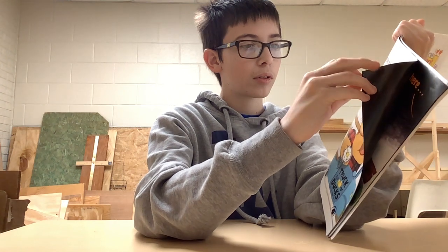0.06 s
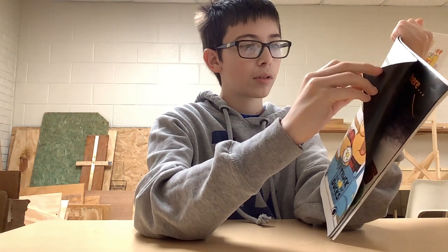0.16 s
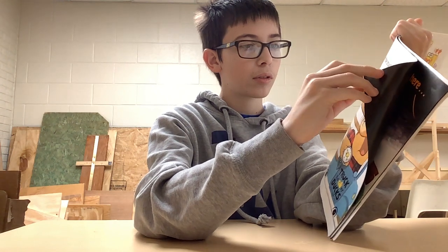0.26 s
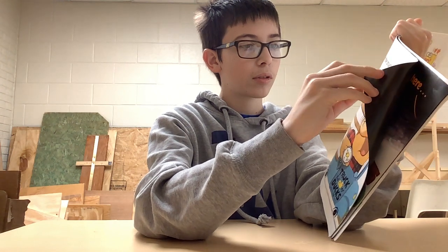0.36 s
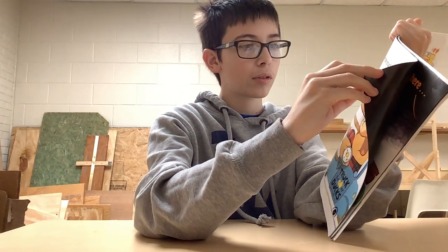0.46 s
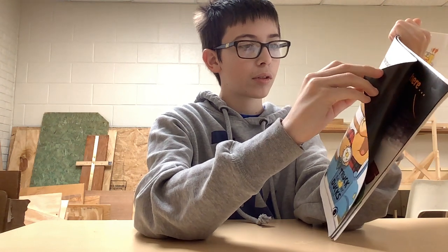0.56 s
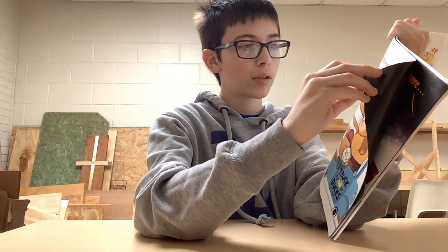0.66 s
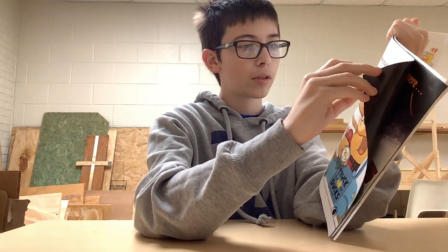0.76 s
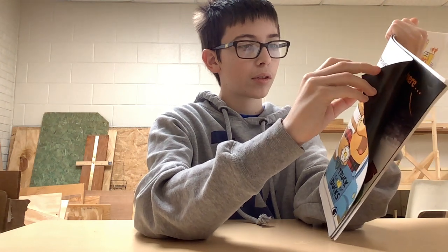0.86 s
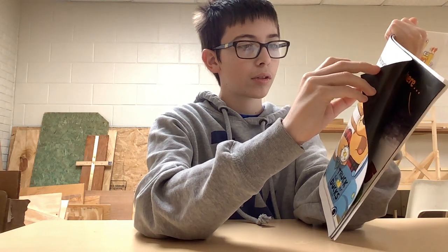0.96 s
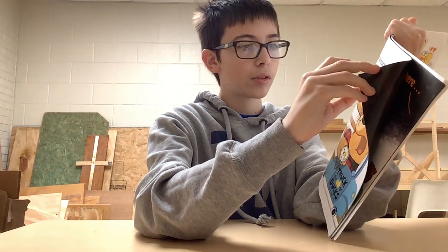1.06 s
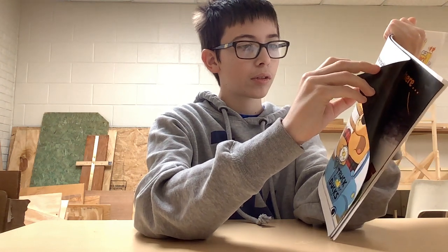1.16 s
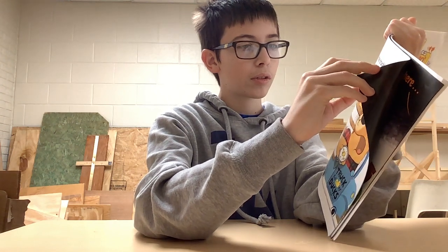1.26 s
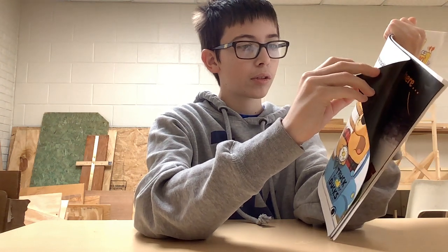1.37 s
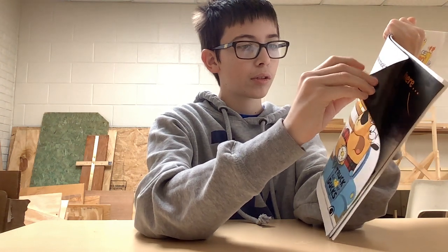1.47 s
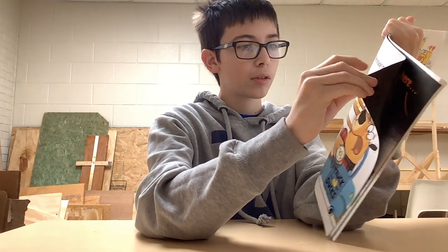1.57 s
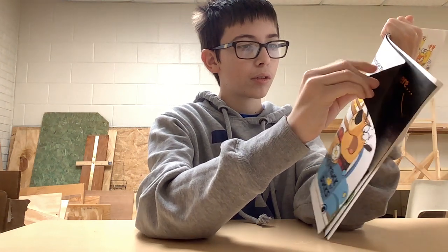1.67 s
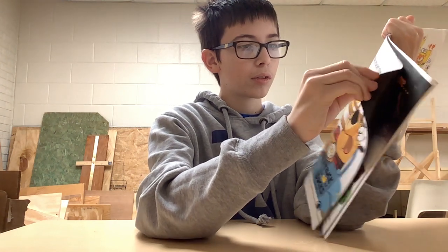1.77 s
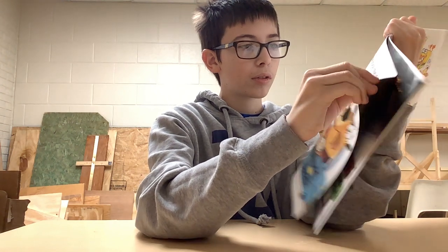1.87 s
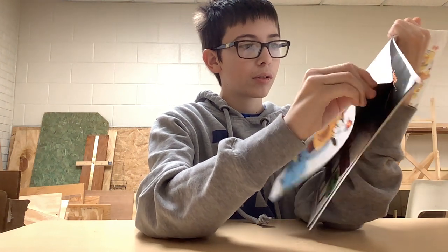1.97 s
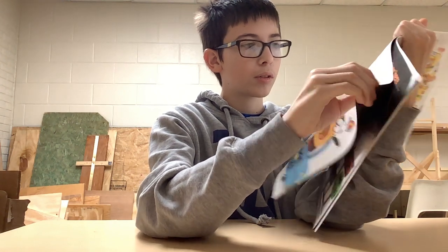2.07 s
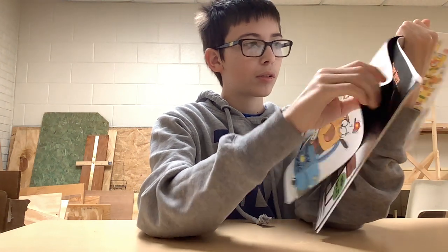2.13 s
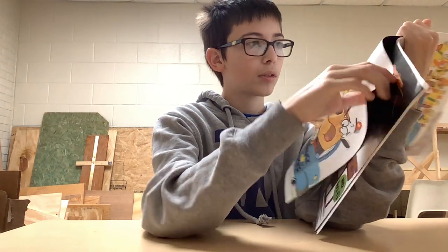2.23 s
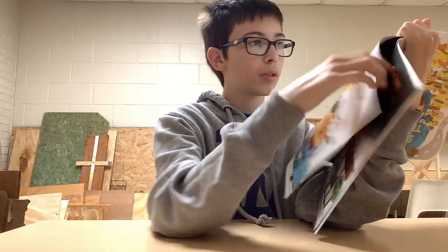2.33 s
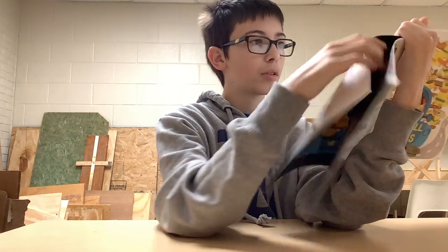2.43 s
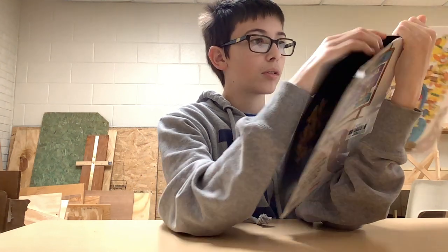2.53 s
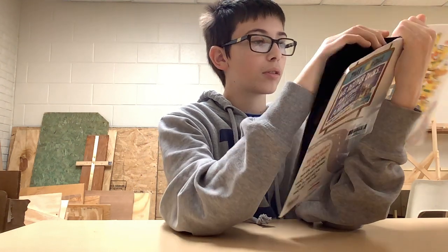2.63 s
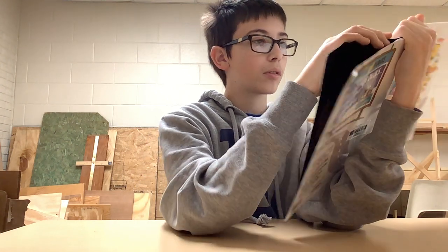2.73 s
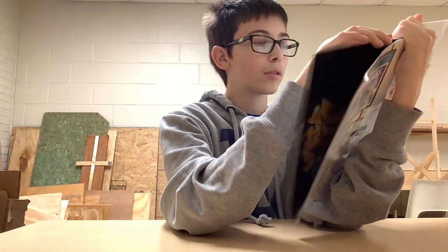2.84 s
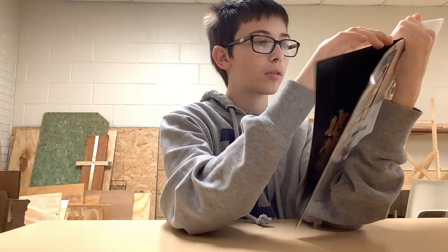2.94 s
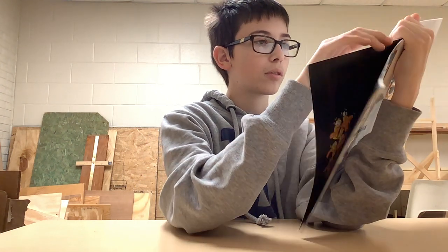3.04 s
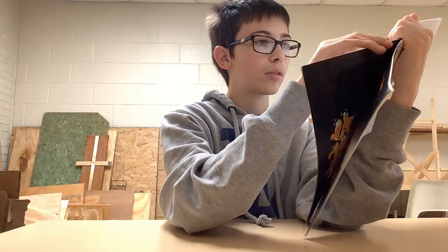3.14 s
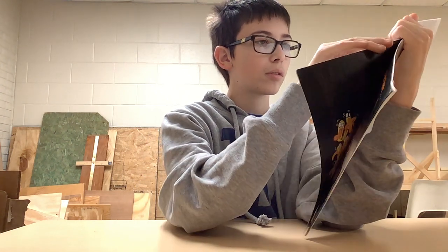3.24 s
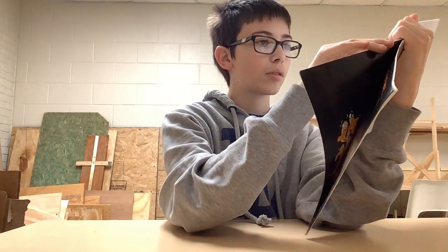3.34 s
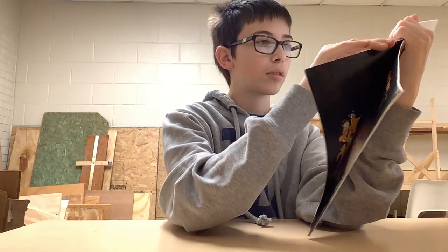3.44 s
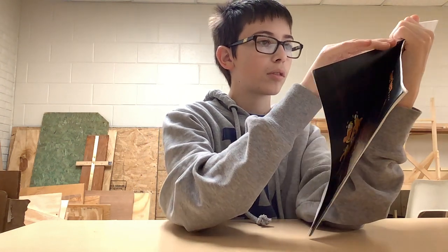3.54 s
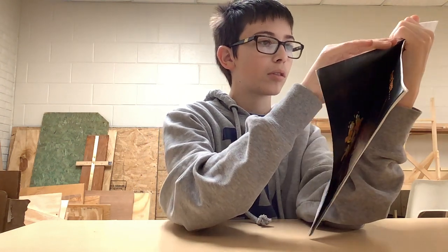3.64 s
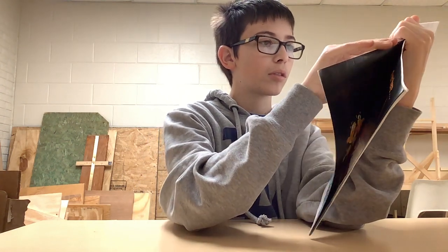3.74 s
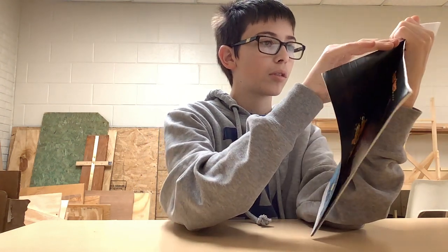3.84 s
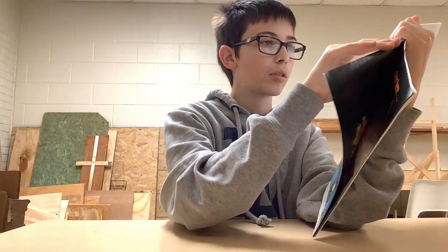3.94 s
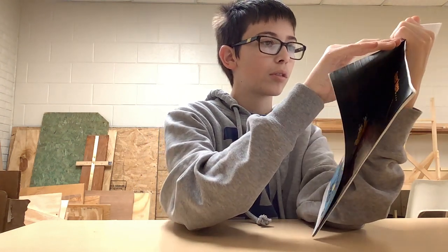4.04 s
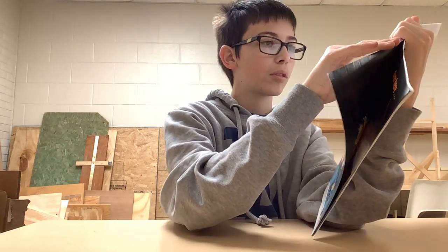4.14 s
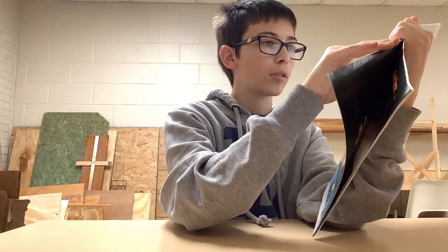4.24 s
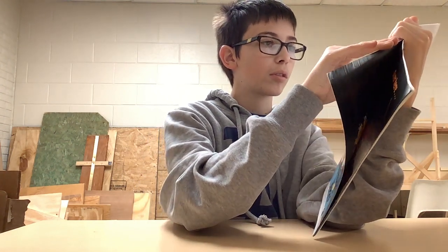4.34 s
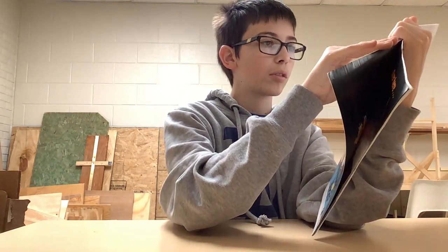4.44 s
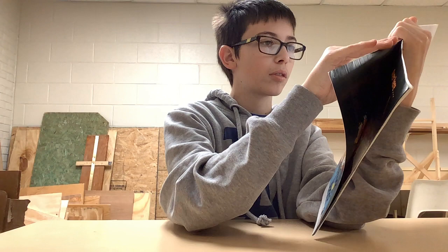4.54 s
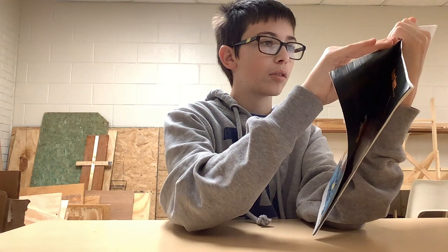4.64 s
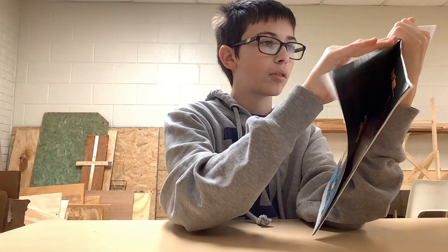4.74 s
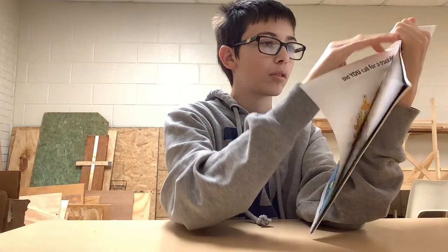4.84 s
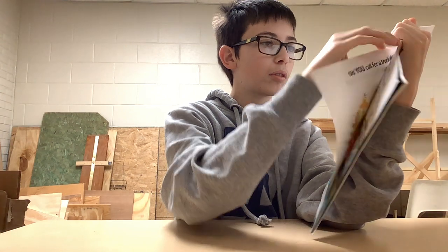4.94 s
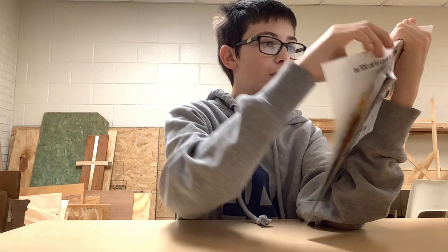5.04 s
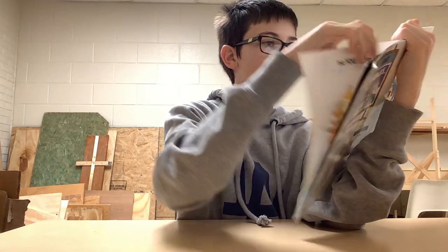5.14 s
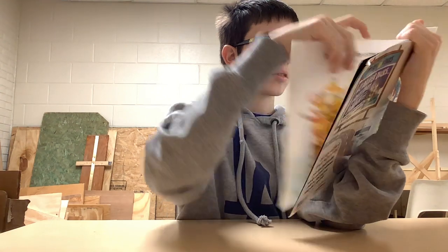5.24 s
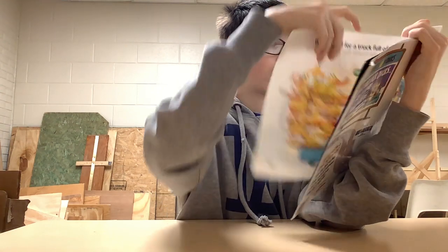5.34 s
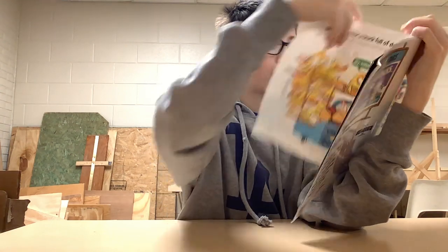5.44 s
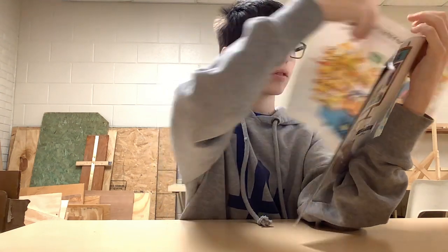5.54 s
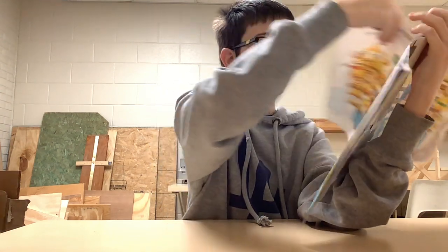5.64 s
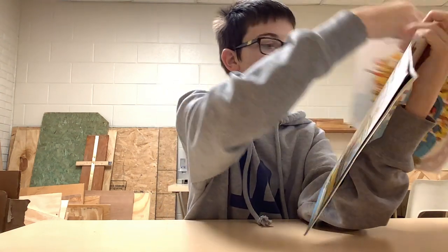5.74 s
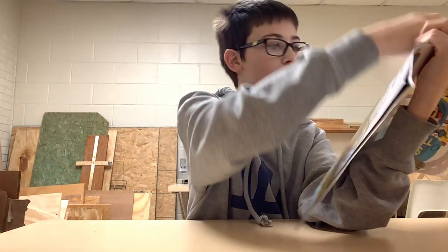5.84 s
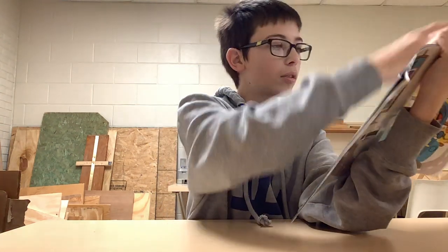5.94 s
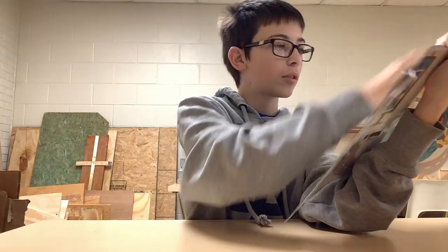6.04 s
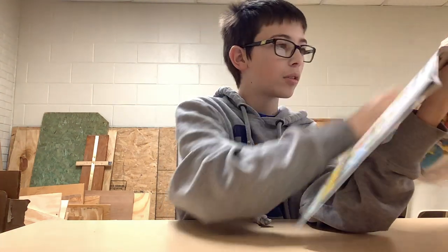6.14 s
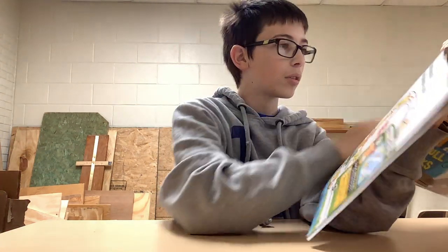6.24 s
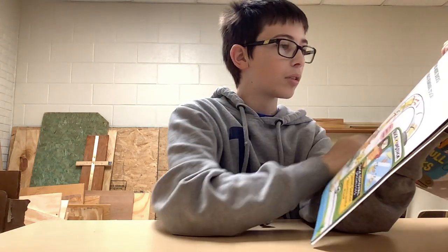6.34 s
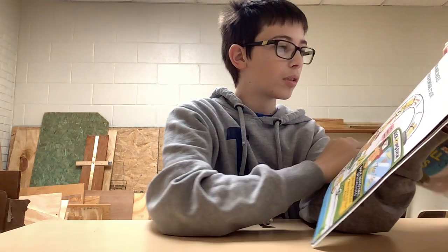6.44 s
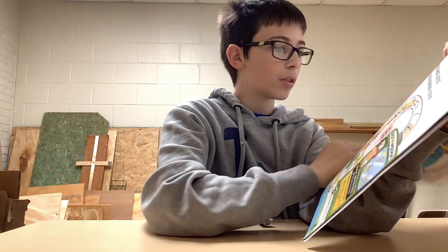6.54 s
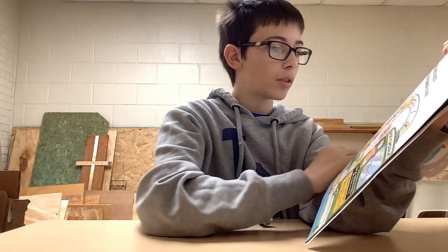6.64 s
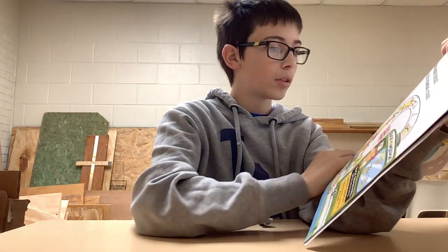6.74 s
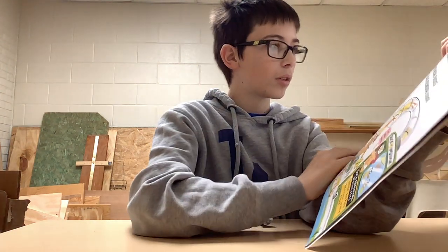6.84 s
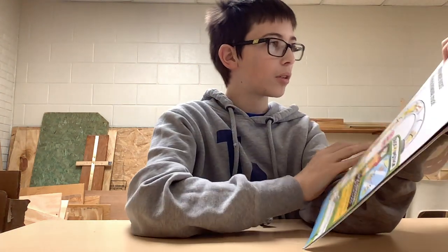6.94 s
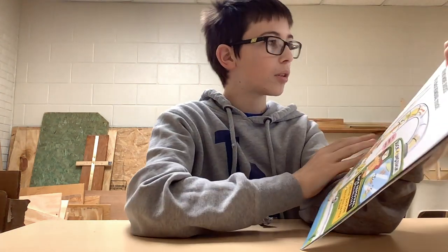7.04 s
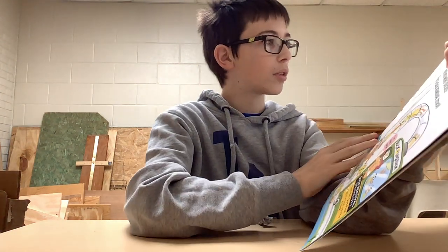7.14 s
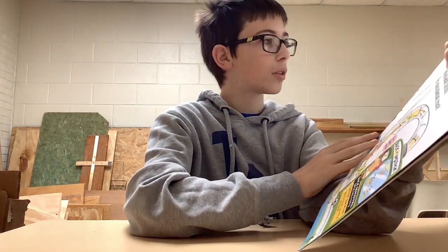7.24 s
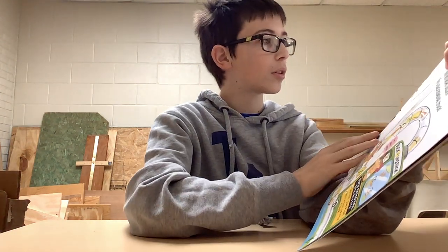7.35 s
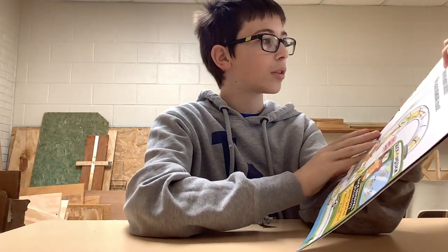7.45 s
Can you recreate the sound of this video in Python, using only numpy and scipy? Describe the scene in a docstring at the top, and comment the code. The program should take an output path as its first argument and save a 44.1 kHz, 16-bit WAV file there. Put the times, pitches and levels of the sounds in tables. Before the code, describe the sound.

Close to the microphone in a small quiet room, large glossy pages are turned at a table. Faint rubbing leads to a swish and soft flaps, then a pause with small sharp corner ticks. A brisker turn follows with bright hisses, hard cracks and dull table bumps, before light sliding fades over a low electrical hum and faint ventilation.

```python
"""A wavering mains hum, ventilation rumble and faint hiss fill a quiet workroom; over them page corners tick
off a fingertip and someone at a table leafs through a large glossy picture book. Bent sheets snap and flap as
short avalanches of noise, arms bump the table as dying sine tones, sheets slide as coloured stick-slip noise
under moving resonances, and late on sleeves brush the table as soft low noise. A small room answers it all."""
import sys
import numpy as np
from scipy import signal
from scipy.fft import rfft, irfft
from scipy.io import wavfile

SR = 44100
rng = np.random.default_rng(int(sys.argv[2]) if len(sys.argv) > 2 else 0)


def materialize(psi):
    """Save the field psi as 16-bit PCM at rate SR to the path in sys.argv[1].

    A 1-D psi becomes a single channel; in a 2-D psi each row is a channel.
    """
    bounded = np.clip(np.atleast_2d(psi).T, -1, 1)
    quanta = np.round(bounded * 32767).astype(np.int16)
    wavfile.write(sys.argv[1], SR, quanta)


N = 330749
TIME = np.arange(N) / SR

# Colour of the ventilation rumble: freq_hz, relative_level_db_per_hz
RUMBLE_COLOUR = [(20, -49.5), (32, -36), (50, -1.5), (80, 6), (110, 5), (160, -1), (210, -7), (280, -12.5),
                 (350, -25), (460, -19.5), (650, -34), (1200, -37.5), (3000, -38), (8000, -61)]
# Colour of the microphone hiss: freq_hz, relative_level_db_per_hz
HISS_COLOUR = [(300, -1.5), (2000, -11.5), (5000, -12), (5900, -11.5), (6350, 1.5), (6800, -5), (7400, -11),
               (8500, -6), (9500, -11), (10200, 3), (11200, -7), (13000, -12.5), (16000, -18)]
# A page corner flicks off a fingertip: start_s, length_s, level_db, sheet_ring_db (re level)
CORNER_TICKS = [(0.109, 0.014, -66.5, -7.5), (0.142, 0.0046, -59, -33), (0.379, .0077, -59.5, -5),
                (1.063, .004, -61, -6), (2.1447, 0.0022, -39, -33), (3.224, 0.007, -50, -4.5),
                (3.3317, 0.0026, -46, -11), (3.4153, 0.0015, -54.5, -7), (3.6835, 0.0067, -59, -1),
                (3.725, 0.0024, -46.5, -9), (3.737, 0.00078, -35, -10), (3.7505, 0.0015, -27.5, -21.5),
                (3.761, .0011, -32.5, -10.5), (3.841, .0028, -55, -5), (3.853, 0.0015, -41.5, -14),
                (4.2802, 0.0031, -42, -19.5), (4.314, 0.0011, -51, -20), (4.319, 0.00024, -40.5, -32),
                (4.667, 0.0095, -58.5, -16), (4.7247, 0.0071, -53.5, -14.5), (4.77, 0.0026, -49.5, -14),
                (4.801, 0.0074, -44, -11), (4.8113, 0.0053, -32, -14.5), (5.255, 0.0061, -42.5, -8),
                (5.295, 0.0043, -32.5, -23), (5.911, 0.0068, -42.5, -2.5), (6.01, 0.0016, -41, -5.5),
                (6.421, 0.0098, -52, -13), (6.4974, 0.0038, -44.5, -13.5)]
# A bent sheet buckles or flaps over: start_s, length_s, patch_pitch_hz, prominence_db, flap_db,
# crack_db (re flap)
SHEET_SNAPS = [(0.3553, .016, 6140, 1, -65, 7), (0.3934, 0.0021, 6630, 2, -56, 11.5),
               (1.077, 0.0021, 11100, 15, -49, 8.5), (1.8604, 0.0025, 3100, 8.5, -40, -0.5),
               (2.404, 0.014, 880, 4, -47.5, -7), (2.468, 0.0084, 730, 8.5, -50.5, -26),
               (2.5965, 0.0079, 950, 7, -46, 1), (2.681, 0.006, 1500, 6, -59, 7.5),
               (2.8477, 0.0093, 910, 9, -41.5, -1), (2.8725, 0.0031, 1030, 0.5, -34.5, -0.5),
               (2.9475, .0083, 1870, 8.5, -40, -23.5), (3.01, .012, 1250, 6.5, -51.5, -32),
               (5.199, 0.0078, 1640, 6.5, -47.5, 12), (5.212, 0.0035, 452, 19, -45.5, -8),
               (5.3584, 0.00088, 2740, 8.5, -28, 10), (5.3648, 0.0019, 2940, 11, -41, 1),
               (5.406, .0049, 570, 1, -39, -6), (5.4505, 0.01, 850, 10.5, -44, -7),
               (5.495, 0.0031, 884, 7.5, -32, -26), (5.5818, 0.0081, 880, 9.5, -40, 0),
               (5.868, .0011, 1000, 10, -29, 7), (5.8717, 0.0024, 1050, 2, -38, 7.5),
               (6.0432, 0.002, 1580, 6, -38, 3), (6.1364, 0.002, 4130, 21.5, -43.5, -1),
               (6.2773, 0.0087, 1070, 7.5, -54.5, -2), (6.454, 0.0094, 10100, 11, -51, -2)]
# Colour of a sheet flexing: freq_hz, relative_level_db_per_hz
SHEET_COLOUR = [(150, 1.5), (220, 2), (330, -8), (410, -2), (470, 1), (570, -6), (680, -9), (780, -3.5),
                (1200, -6), (1450, -6), (1650, -11.5), (2000, -6), (2600, 3), (4000, -37)]
# Colour of a cracking crease and its ring: freq_hz, relative_level_db_per_hz
CRACK_COLOUR = [(1500, 7.5), (1950, 1), (2200, -4.5), (2950, 2.5), (3600, -2), (4600, -3.5), (5400, 0),
                (6100, -2.5), (8400, 2.5), (9500, 1), (12200, -7.5), (16000, -19)]
# Arms bump the table: start_s, level_db, pitch_hz
TABLE_BUMPS = [(1.081, -52.5, 283), (2.419, -41, 111), (2.875, -56, 186), (5.413, -42.5, 194),
               (5.622, -43.5, 148), (5.868, -47, 179), (6.421, -37, 99.3), (6.486, -37, 77.7),
               (6.962, -48.5, 184), (7.092, -46.5, 153.2), (7.309, -46, 155)]
# A sheet slides over its neighbour or under the hand: start_s, length_s, hiss_db,
# swell_db (start to end), flex_db (re hiss), sheen_db (re hiss)
PAGE_STROKES = [(1.39, 0.1, -65, 17, -34, 1), (1.47, 0.11, -55, 5.5, -23, 0.5),
                (1.658, 0.048, -57, 2, -14.5, -1.5), (1.744, 0.32, -54.5, -5, -10, -1.5),
                (2.101, 0.13, -50.5, 8, -10, 2), (2.242, 0.14, -42.5, 2, -21, 1),
                (2.441, 0.16, -51.5, 9, -7, 1.5), (2.604, 0.18, -64, -3, -1.5, -5),
                (2.865, 0.078, -56.5, -15, 2, -16), (2.925, .16, -68, 6, -15, -17),
                (3.119, 0.03, -65, 11, -7.5, -23), (3.177, 0.089, -63.5, -4, -1, -27),
                (3.304, 0.18, -66, -2, -5, -10), (3.5, 0.061, -65, 9, -3, -15),
                (3.735, 0.18, -69, -13, -9, -18), (4.06, 0.11, -72.5, -10, -12, -3),
                (4.72, 0.093, -58.5, 7, -12.5, -7.5), (4.786, 0.11, -39, -0.5, -26.5, -6.5),
                (5.005, 0.18, -41.5, -10, -23, -6), (5.189, 0.19, -44, -6.5, -11, -4.5),
                (5.44, 0.12, -50, 7, -4, 0.5), (5.566, 0.16, -52, -16, -2, 1.5),
                (5.749, 0.13, -55.5, 17, -9.5, 0), (5.864, 0.084, -47.5, 0.5, -3.5, -4),
                (5.943, 0.21, -51, 3.5, -12.5, 2.5), (6.133, 0.37, -54.5, -12, -19, 3.5),
                (6.506, 0.32, -62.5, -5.5, -15, 3), (6.845, 0.21, -61, 6, -18, 3),
                (7.047, 0.43, -70.5, -6, -17, -5), (7.407, 0.085, -64.5, 10, -35, 3)]
# Colour of paper friction: freq_hz, relative_level_db_per_hz
FRICTION_COLOUR = [(1500, -5), (1900, -5), (2270, -15), (2700, -4), (3250, -6.5), (4400, -9), (5100, -6.5),
                   (6800, -3), (7700, -2), (9300, 4.5), (11500, -4), (13000, -15), (16000, -22)]
# Sleeves brush the table: start_s, length_s, level_db
SLEEVE_PULLS = [(6.73, 0.057, -74), (6.97, 0.21, -71), (7.285, .08, -72)]
# Colour of the cloth: freq_hz, relative_level_db_per_hz
CLOTH_COLOUR = [(250, 2.5), (500, 3.5), (750, -3), (1100, -21), (2000, -18.5)]
# Decay of the room, shorter above the bass: freq_hz, t60_s
ROOM_DECAY = [(200, 0.9), (1000, 0.23), (4000, 0.2), (12000, 0.22)]

# Ranges in which the paper sounds (low Hz, high Hz)
FLEX_HZ, RING_HZ, CRACK_HZ, SHEEN_HZ = (170, 1900), (1750, 4100), (4100, 11500), (11500, 17000)
HUM_HZ = 120.0
CUTOFF_HZ = 15900
# A corner's ping: pitch when ring equals crack, rise per dB of weaker ring, prominence, flap re ring
CORNER_HZ, CORNER_HZ_PER_DB, CORNER_DB, CORNER_FLAP_DB = 7870, 88, 7, -7.5
RING_DB = -4.5  # a snap's ring, re the mean of its flap and crack in dB
BUMP_CYCLES = 28  # a bump falls by 60 dB in this many cycles
# Every stroke gathers speed, holds and dies away
ATTACK_S, ATTACK_DB_PER_S, RELEASE_DB_PER_S = 0.024, 607, 400
# The rasp, in dB re hiss, grows as the sheet bends and shrinks where smooth gloss glides (dB per dB)
RASP_DB, RASP_PER_FLEX, RASP_PER_SHEEN = -13, 0.28, -0.51
# The sheet's belly: flex level where it is fully heard, dB lost per dB below that, its upper edge
BELLY_FULL_DB, BELLY_LAG, BELLY_EDGE_HZ = -53.5, 0.31, 800


def from_db(db):
    """Decibels to gain."""
    return 10 ** (np.asarray(db) / 20)


def rms_one(x):
    """Scale to unit power."""
    return x / np.sqrt(np.mean(x ** 2) + 1e-20)


def at_hz(points, hz):
    """Read a table on a log-frequency axis."""
    freq_hz, value = np.transpose(points)
    return np.interp(np.log(hz), np.log(freq_hz), value)


def drift(rate):
    """Smooth random wander with spread 1 and about rate turns a second."""
    step = 20  # drawn once per this many samples, then joined by straight lines
    settle = 4000
    r = np.exp(-2 * np.pi * rate * step / SR)
    noise = rng.standard_normal(N // step + settle + 2)
    slow = signal.lfilter([1], [1, -2 * r, r * r], noise)[settle:]
    return np.interp(np.arange(N) / step, np.arange(len(slow)), rms_one(slow))


def colour(x, spectrum, band=(10, 20000)):
    """Causal (minimum-phase) filter with this spectrum inside a band; white noise keeps its power."""
    size = 8192
    hz = np.maximum(np.fft.rfftfreq(size, 1 / SR), 1)
    band_edges = np.sqrt((1 + (band[0] / hz) ** 10) * (1 + (hz / band[1]) ** 14))
    gain = from_db(at_hz(spectrum, hz)) / band_edges
    # Folding the cepstrum forward in time gives minimum phase
    cepstrum = irfft(np.log(rms_one(gain) + 1e-5))
    cepstrum[1:size // 2] *= 2
    cepstrum[size // 2 + 1:] = 0
    response = irfft(np.exp(rfft(cepstrum)))
    return signal.oaconvolve(x, response)[:N]


def resonate(x, hz, quality, boost_db):
    """Lift one resonance out of a broad sound."""
    b, a = signal.iirpeak(hz, quality, fs=SR)
    return x + (from_db(boost_db) - 1) * signal.lfilter(b, a, x)


def add(out, start_s, sound):
    """Mix a sound in at its time."""
    start = round(start_s * SR)
    out[start:start + len(sound)] += sound[:N - start]


def background(hum_db, waver_db, rumble_db, hiss_db):
    """A mains hum wavering in level and pitch, ventilation rumble and microphone hiss."""
    phase = 2 * np.pi * HUM_HZ * TIME + 0.082 * drift(1.9)
    hum = np.sqrt(2) * from_db(hum_db + waver_db * drift(5.8)) * np.sin(phase)
    rumble = from_db(rumble_db) * colour(rng.standard_normal(N), RUMBLE_COLOUR, (33, SR / 2))
    hiss = from_db(hiss_db) * colour(rng.standard_normal(N), HISS_COLOUR)
    return hum + rumble + hiss


def burst(length_s, grain_db):
    """A crease gives way: an avalanche of slips swells and dies away, with unit power over its length."""
    t = TIME[:SR // 10]
    noise, grain = rng.standard_normal((2, len(t)))
    swell = t * np.exp(-t / (0.89 * length_s))
    x = np.tanh(noise) * from_db(grain_db * grain) * swell
    return x * np.sqrt(length_s * SR / np.sum(x ** 2))


def snap(length_s, flap_db, ring_db, crack_db, sway_s=0.00082, ring_stretch=1.24):
    """A snap cracks at the crease and shakes the whole sheet, whose lower sound lasts longer."""
    length_s = max(length_s, 3e-4)
    flap_s = length_s + sway_s
    # The longer flap is turned down so that its energy stays the same
    flap = from_db(flap_db) * np.sqrt(length_s / flap_s) * burst(flap_s, grain_db=-3.5)
    ring = from_db(ring_db) * burst(ring_stretch * length_s, grain_db=0.5)
    crack = from_db(crack_db) * burst(length_s, grain_db=8.0)
    low = colour(flap, SHEET_COLOUR, FLEX_HZ)
    middle = colour(ring, CRACK_COLOUR, RING_HZ)
    high = colour(crack, CRACK_COLOUR, (CRACK_HZ[0], SHEEN_HZ[1]))
    return low + middle + high


def ticking():
    """Page corners flick free with tiny snaps; the less of the sheet moves, the higher they ping."""
    out = np.zeros(N)
    for start_s, length_s, level_db, sheet_ring_db in CORNER_TICKS:
        ring_db = level_db + sheet_ring_db
        sound = snap(length_s, ring_db + CORNER_FLAP_DB, ring_db, level_db)
        pitch_hz = CORNER_HZ - CORNER_HZ_PER_DB * sheet_ring_db
        add(out, start_s, resonate(sound, pitch_hz, quality=10.7, boost_db=CORNER_DB))
    return out


def snapping():
    """A small patch of buckling paper pings high, a wide belly pops low."""
    out = np.zeros(N)
    for start_s, length_s, pitch_hz, prominence_db, flap_db, crack_db in SHEET_SNAPS:
        ring_db = flap_db + crack_db / 2 + RING_DB
        sound = snap(length_s, flap_db, ring_db, flap_db + crack_db)
        add(out, start_s, resonate(sound, pitch_hz, quality=6.7, boost_db=prominence_db))
    return out


def table_bumps(rise_s):
    """Sleeved arms land softly, so only a low mode of the table answers."""
    out = np.zeros(N)
    for start_s, level_db, pitch_hz in TABLE_BUMPS:
        t = np.maximum(TIME - start_s, 0)
        decay_db = 60 * np.minimum(t * pitch_hz / BUMP_CYCLES, 2)
        soft_onset = 1 - np.exp(-t / rise_s)
        out += from_db(level_db - decay_db) * soft_onset * np.sin(2 * np.pi * pitch_hz * t)
    return out


def stroke(start_s, length_s, level_db, swell_db=0):
    """Gain of one sliding movement: attack, a hold that swells or sags, release."""
    t = TIME - start_s
    attack_db = ATTACK_DB_PER_S * np.clip(t - ATTACK_S, -.3, 0)
    hold_db = level_db + swell_db * (np.clip(t / length_s, 0, 1) - .5)
    release_db = RELEASE_DB_PER_S * np.clip(t - length_s, 0, .5)
    return from_db(attack_db + hold_db - release_db)


def slips(per_s, spread_db, smooth):
    """Countless tiny stick-slip releases of uneven size, on a bed of smooth friction."""
    size_db = spread_db * np.minimum(rng.exponential(1, N), 4)
    sizes = from_db(size_db) * rng.choice([-1, 1], N)
    grains = rms_one(sizes * (rng.random(N) < per_s / SR))
    return rms_one(grains + smooth * rng.standard_normal(N))


def bending(gain):
    """The bending sheet crumples softly; the harder it is bent, the deeper it sounds."""
    grains = slips(per_s=500, spread_db=1.5, smooth=0.7) * gain * from_db(2.0 * drift(31))
    crumple = colour(grains, SHEET_COLOUR, FLEX_HZ)
    highpass = signal.butter(1, BELLY_EDGE_HZ, "high", fs=SR, output="sos")
    upper = signal.sosfilt(highpass, crumple)
    belly_gain = np.minimum(gain / from_db(BELLY_FULL_DB), 1) ** BELLY_LAG
    return upper + belly_gain * (crumple - upper)


def curling(x, patchy_db, quality, rate, count=22):
    """As a sheet changes its curve, one resonance after another takes over and fades again."""
    out = x.copy()
    for hz in np.geomspace(450, 12500, count):
        b, a = signal.iirpeak(hz, quality, fs=SR)
        boost = from_db(patchy_db * np.clip(drift(rate), -2, 2)) - 1
        out += boost * signal.lfilter(b, a, out)
    return out * np.sqrt(np.sum(x ** 2) / np.sum(out ** 2))  # overall energy unchanged


def sliding():
    """Sheets and fingers rub with a chattering hiss; the bending sheet crumples softly below it."""
    power = np.zeros((4, N))
    for start_s, length_s, hiss_db, swell_db, flex_db, sheen_db in PAGE_STROKES:
        rasp_db = RASP_DB + RASP_PER_FLEX * flex_db + RASP_PER_SHEEN * sheen_db
        layer_gains = from_db([0, rasp_db, sheen_db, flex_db])
        power += np.outer(layer_gains, stroke(start_s, length_s, hiss_db, swell_db)) ** 2
    hiss_gain, rasp_gain, sheen_gain, flex_gain = np.sqrt(power)
    chatter = from_db(1.6 * drift(70))
    rub = slips(per_s=2500, spread_db=1.0, smooth=0.9) * chatter
    hiss = colour(rub * hiss_gain, FRICTION_COLOUR, CRACK_HZ)
    rasp = colour(rub * rasp_gain, FRICTION_COLOUR, RING_HZ)
    sheen = colour(rub * sheen_gain, FRICTION_COLOUR, SHEEN_HZ)
    return curling(hiss + rasp + sheen + bending(flex_gain), patchy_db=5.0, quality=26.0, rate=5.8)


def sleeve():
    """Thick cloth drags in soft, uneven pulls."""
    gain = sum(stroke(start_s, length_s, level_db) for start_s, length_s, level_db in SLEEVE_PULLS)
    drag = rng.standard_normal(N) * gain * from_db(1.8 * drift(25))
    return colour(drag, CLOTH_COLOUR, (250, 2500))


def room(x, wet_db, echo_db, echo_s, build_s):
    """One near reflection and a diffuse tail whose bass lingers longest."""
    t = TIME[:SR * 7 // 10]
    edges = np.geomspace(100, 17000, 9)
    response = np.zeros(len(t))
    for low, high in zip(edges, edges[1:]):
        bandpass = signal.butter(2, [low, high], "band", fs=SR, output="sos")
        noise = signal.sosfilt(bandpass, rng.standard_normal(len(t)))
        t60_s = at_hz(ROOM_DECAY, np.sqrt(low * high))
        response += noise * 1000 ** (-t / t60_s)  # a factor of 1000 is 60 dB
    response *= 1 - np.exp(-t / build_s)
    response *= from_db(wet_db) / np.sqrt(np.sum(response ** 2))
    response[round(echo_s * SR)] += from_db(echo_db)
    return x + signal.oaconvolve(x, response)[:N]


def scene():
    """The book and the table in the room, over its steady background."""
    steady = background(hum_db=-55.5, waver_db=1.8, rumble_db=-61.5, hiss_db=-73.5)
    paper = ticking() + snapping() + sliding()
    close = paper + table_bumps(rise_s=0.0035) + sleeve()
    heard = room(close, wet_db=-13.5, echo_db=-11.0, echo_s=0.0063, build_s=0.0084)
    return (heard + steady)[None]


def record(dry):
    """A steep elliptic low-pass cuts the top."""
    lowpass = signal.ellip(10, .1, 70, CUTOFF_HZ, fs=SR, output="sos")
    return signal.sosfilt(lowpass, dry)


dry = scene()
out = record(dry)
materialize(out)
```